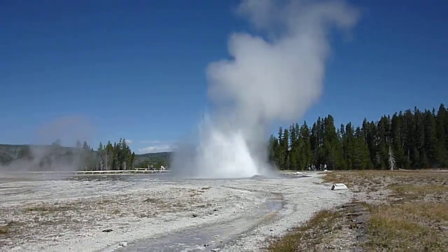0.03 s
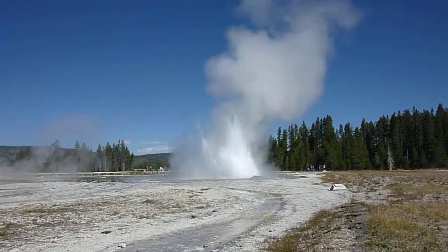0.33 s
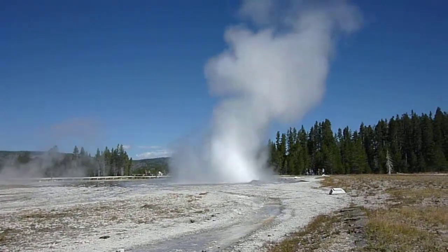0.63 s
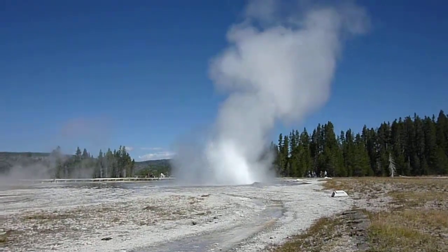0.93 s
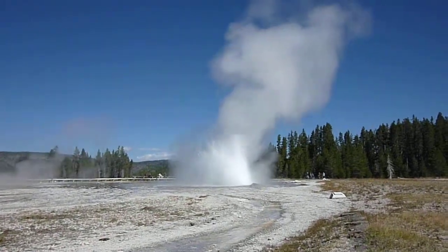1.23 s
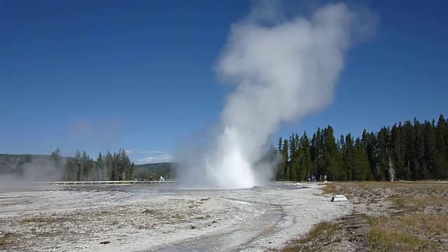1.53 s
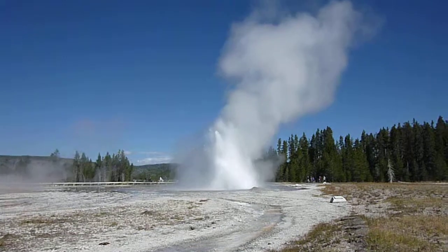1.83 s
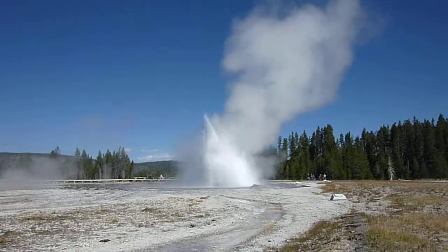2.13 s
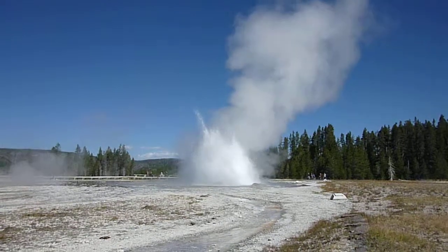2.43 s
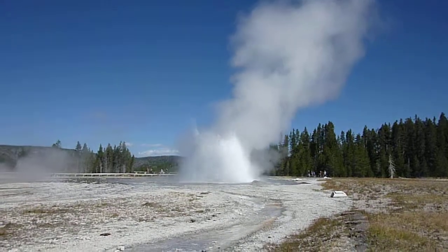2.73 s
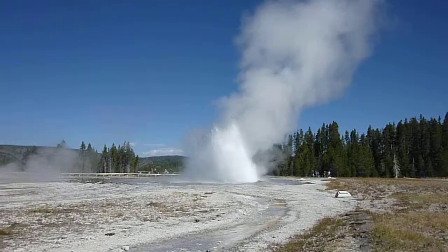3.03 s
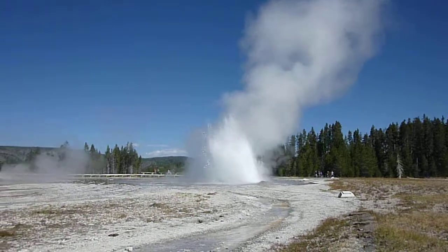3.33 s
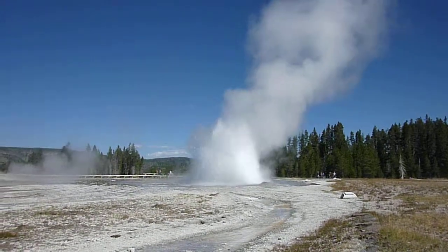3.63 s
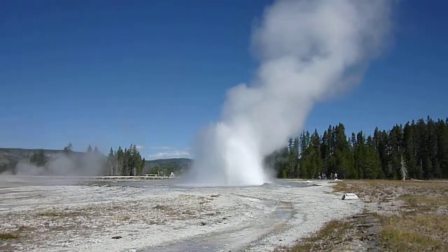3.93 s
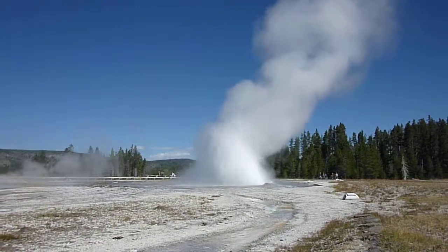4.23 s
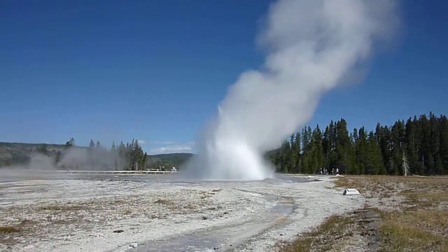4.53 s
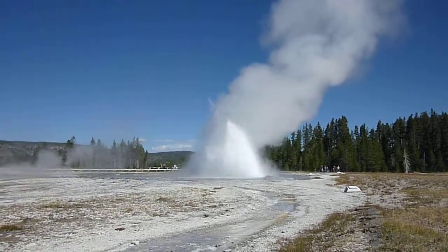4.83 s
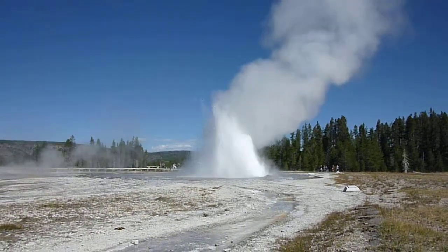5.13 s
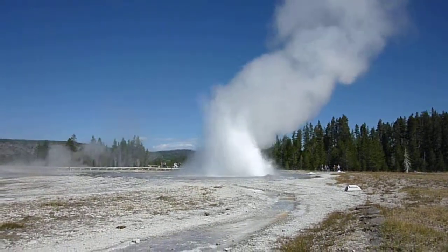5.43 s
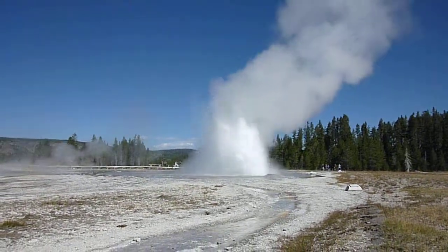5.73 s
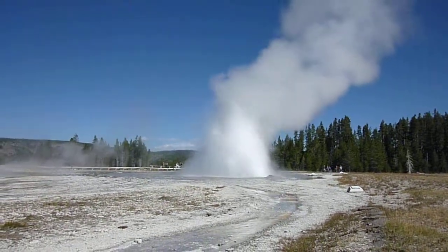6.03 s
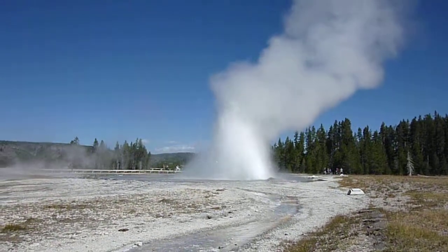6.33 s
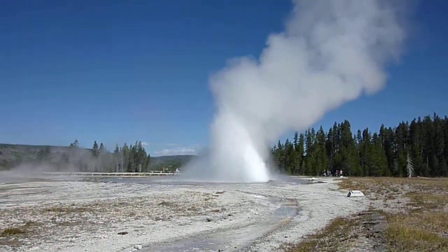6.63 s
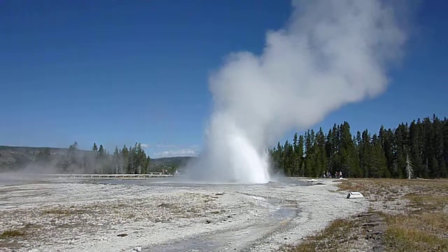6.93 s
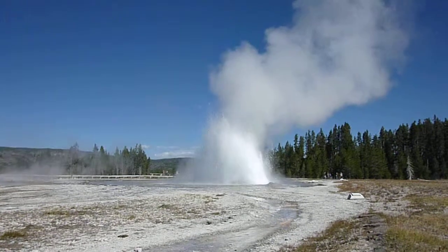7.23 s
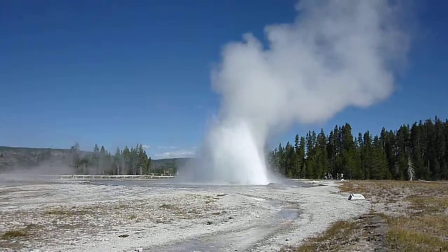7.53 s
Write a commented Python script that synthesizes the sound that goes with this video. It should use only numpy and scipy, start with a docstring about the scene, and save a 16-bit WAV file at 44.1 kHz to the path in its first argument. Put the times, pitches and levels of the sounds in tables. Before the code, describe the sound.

A geyser erupts some way off with a steady low roar, splashing water, hissing spray and a few soft thuds.

```python
"""A sinter flat with a fountain geyser playing some way off, heard by a small camera.
Steam and water churn in the vent with a low roar, and big steam pockets burst with soft thuds.
The thrown water rains back as a splashing wash in the pool and a hiss of spray on wet stone
that swells after each tall jet."""
import sys
import numpy as np
from scipy import signal
from scipy.fft import rfft, irfft, next_fast_len
from scipy.io import wavfile
from scipy.ndimage import uniform_filter1d, map_coordinates

SR = 44100
rng = np.random.default_rng(int(sys.argv[2]) if len(sys.argv) > 2 else 0)


def digitize_waveform(pressure):
    """Quantize a signal to 16-bit integers and store it at the path in sys.argv[1].

    Rows of a 2-D input are taken as channels; values are limited to [-1, 1].
    """
    field = np.atleast_2d(pressure).T
    bounded = np.clip(field, -1, 1)
    quanta = np.round(bounded * 32767).astype(np.int16)
    wavfile.write(sys.argv[1], SR, quanta)


N = 333837

# Jets leaving the vent. Each row: time in seconds, roar surge in dB, later shower swell in dB.
JETS = [(-.7, 0, 1.2), (1.8, 0, .8), (2.14, 1.1, 1.6), (2.88, 2.6, .6), (3.75, 1.4, 1.7), (5.03, .8, .9),
        (5.7, 1.4, .7), (6.72, .6, 2), (7.38, 2.8, 0)]


def vent_roar():
    """Turbulent steam and many small collapsing pockets roar, surging with each jet."""
    # Each row: frequency in Hz, relative density in dB.
    roar_spectrum = [(20, -23.5), (40, -16), (65, -9), (105, -2.5), (180, 0.5), (290, -1), (350, -3.5),
                     (480, -6.5), (1000, -17.5), (2500, -50)]
    jet_s, surge_db, _ = np.transpose(JETS)
    level_db = -55 + swells(jet_s, surge_db, rise_s=0.19, fall_s=0.25)
    steam = turbulence(patchy_db=0.78, band_count=3, frame_count=10)
    pockets = amp(-8) * impacts(per_s=200, spread_db=2.5)
    return amp(level_db) * coloured(steam + pockets, roar_spectrum)


def steam_bursts():
    """Each big steam pocket swells, collapses and rebounds within about one cycle."""
    # Each row: centre in seconds, level in dB, pitch in Hz.
    pockets = [(0.381, -50, 220), (1.697, -43.5, 180), (2.132, -43.5, 106), (2.150, -42, 135),
               (2.214, -47, 190), (5.936, -49.5, 97), (7.317, -43, 210), (7.329, -44, 160),
               (7.389, -40.5, 151), (7.514, -44, 125)]
    t, thuds = np.arange(N) / SR, np.zeros(N)
    for centre_s, db, hz in pockets:
        turns = hz * (t - centre_s)
        thuds -= amp(db) * np.sin(2 * np.pi * turns) * np.exp(-(turns / 0.71) ** 2)
    return thuds


def pool_splash(shower_db):
    """Falling water slaps and bubbles in the pool, swelling with heavy slugs and a little with showers."""
    # Slugs landing. Each row: time in seconds, swell in dB.
    slugs = [(.2, 1), (.73, .8), (1.35, 1.3), (1.7, 1), (2.92, 0.8), (3.7, 0.6), (4.06, 0.3)]
    # Each row: frequency in Hz, relative density in dB.
    splash_spectrum = [(150, -20), (400, 1), (570, 2.5), (720, 0), (950, 0), (1250, -2), (2000, -4.5),
                       (3000, -10), (4500, -14.5), (8000, -42)]
    level_db = -57 + 0.28 * shower_db + swells(*np.transpose(slugs), rise_s=0.21, fall_s=0.19)
    wash = turbulence(patchy_db=0.43, band_count=6, frame_count=10)
    slaps = amp(-8) * impacts(per_s=800, spread_db=3)
    bubbling = amp(-14.5) * bubbles(count=1200, centre_hz=702, spread_oct=0.6, cycles=25, spread_db=2.5)
    return amp(level_db) * (coloured(wash + slaps, splash_spectrum) + bubbling)


def spray_hiss(shower_db):
    """Fine drops hiss on wet stone as each jet comes down."""
    # Each row: frequency in Hz, relative density in dB.
    spray_spectrum = [(1200, -19), (2600, -4), (3800, -1), (4600, -0.5), (5400, 2.5), (6300, 1.76),
                      (7200, -1.5), (7900, -5), (8400, -14.5), (8900, -38.5)]
    drops = rng.standard_normal(N) + amp(-7) * impacts(per_s=3000, spread_db=3)
    level_db = -62 + shower_db + 0.11 * wobble(knots_per_s=10)
    return amp(level_db) * coloured(drops, spray_spectrum)


def turbulence(patchy_db, band_count, frame_count):
    """White noise whose level drifts in patches of time and frequency."""
    spectra = signal.stft(rng.standard_normal(N), nperseg=512)[2]
    patches = uniform_filter1d(rng.standard_normal(spectra.shape), band_count, axis=0)
    patches = uniform_filter1d(patches, frame_count, axis=1)
    return unit(signal.istft(spectra * amp(patchy_db * unit(patches)), nperseg=512)[1][:N])


def impacts(per_s, spread_db):
    """Tiny blows of uneven size at random moments."""
    hit = rng.random(N) < per_s / SR
    return unit(hit * rng.choice([-1, 1], N) * amp(spread_db * rng.standard_normal(N)))


def bubbles(count, centre_hz, spread_oct, cycles, spread_db):
    """Bubbles ring and die away while rising in pitch."""
    start = rng.integers(0, N, (count, 1))
    pitch, size = rng.standard_normal((count, 2)).T[:, :, None]
    hz = np.clip(centre_hz * 2 ** (spread_oct * pitch), 150, 3000)
    samples = np.arange(SR // 20)
    turns = hz * samples / SR
    age = turns / cycles
    envelope = amp(spread_db * size - 60 * age) * (1 - np.exp(-turns))
    rings = envelope * np.sin(2 * np.pi * turns * (1 + age / 8))
    return unit(np.bincount((start + samples).ravel(), rings.ravel(), N)[:N])


def swells(peaks_s, sizes_db, rise_s, fall_s):
    """Level in dB of swells that rise smoothly to a peak, then die away."""
    age_s = np.arange(N) / SR - np.asarray(peaks_s)[:, None]
    rise = np.sin(np.pi / 2 * np.clip(1 + age_s / rise_s, 0, 1)) ** 2
    return np.asarray(sizes_db) @ (rise * np.exp(-np.maximum(age_s, 0) / fall_s))


def wobble(knots_per_s):
    """A smooth random curve."""
    knots = rng.standard_normal(int(N * knots_per_s / SR) + 4)
    return map_coordinates(knots, [np.arange(N) * knots_per_s / SR])


def coloured(x, spectrum):
    """x shaped by (Hz, dB) points on a log axis, at rms 1."""
    points_hz, db = np.transpose(spectrum)
    return unit(filtered(x, lambda hz: amp(np.interp(np.log(hz + 1), np.log(points_hz), db))))


def filtered(x, response):
    """x through a frequency response."""
    size = next_fast_len(N + SR // 2)
    return irfft(rfft(x, size) * response(np.fft.rfftfreq(size, 1 / SR)), size)[:N]


def amp(db):
    """Decibels to gain."""
    return 10 ** (np.asarray(db) / 20)


def unit(x):
    """x scaled to rms 1."""
    return x / np.sqrt(np.mean(x ** 2) + 1e-20)


def scene():
    """The geyser in mono; each jet showers down one flight time after it leaves the vent."""
    flight_s = 0.72
    jet_s, _, swell_db = np.transpose(JETS)
    shower_db = swells(jet_s + flight_s, swell_db, rise_s=0.33, fall_s=1.35)
    return (vent_roar() + steam_bursts() + pool_splash(shower_db) + spray_hiss(shower_db))[None]


def record(dry):
    """The camera adds a faint whine, cuts three notches and the top treble, and rests off zero."""
    # Each row: centre in Hz, width in Hz.
    notches = [(3000, 760), (4395, 800), (8000, 760)]
    whine_hz, top_hz, dc_offset = 2344, 8900, -0.0399
    whine = amp(-86.5) * np.sin(2 * np.pi * whine_hz * np.arange(N) / SR)

    def response(hz):
        cuts = [(centre**2 - hz**2) / (centre**2 - hz**2 + 1j * hz * width) for centre, width in notches]
        return np.prod(cuts, axis=0) * (hz < top_hz)

    return filtered(dry[0] + whine, response)[None] + dc_offset


dry = scene()
out = record(dry)
digitize_waveform(out)
```